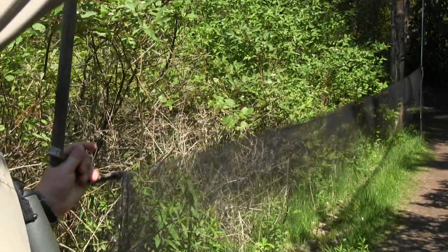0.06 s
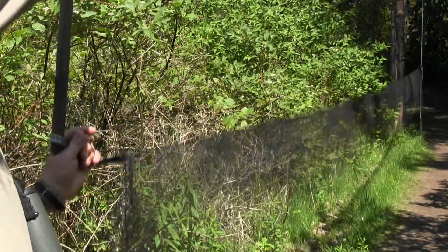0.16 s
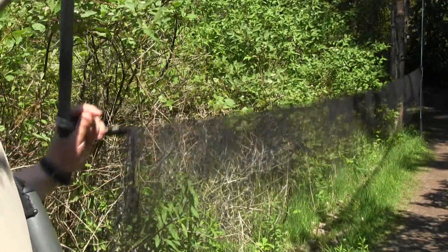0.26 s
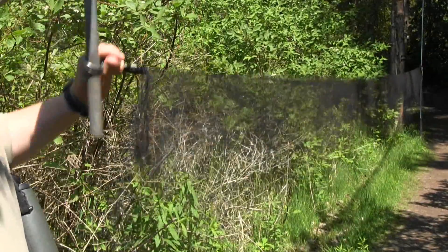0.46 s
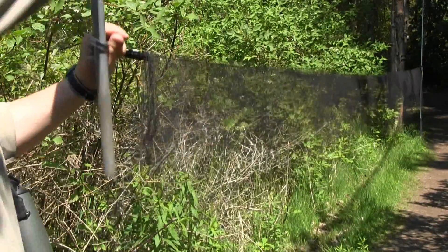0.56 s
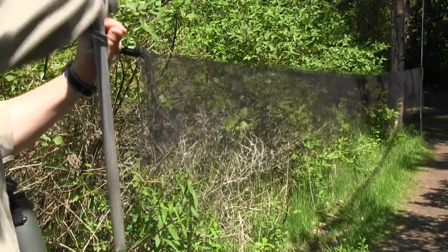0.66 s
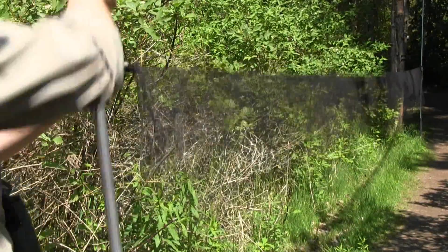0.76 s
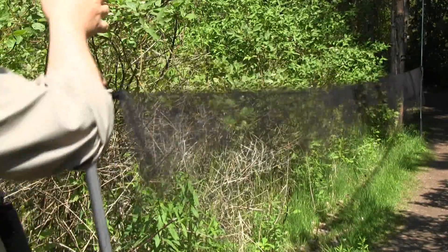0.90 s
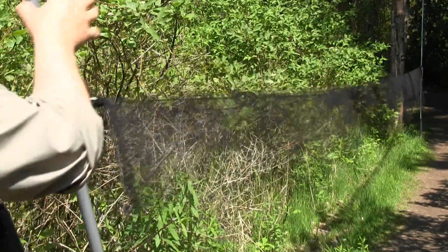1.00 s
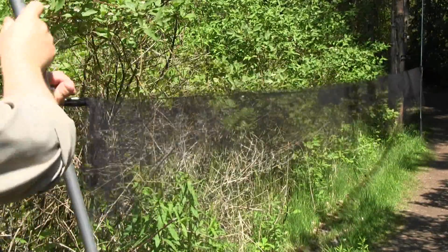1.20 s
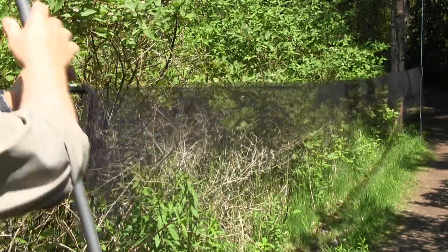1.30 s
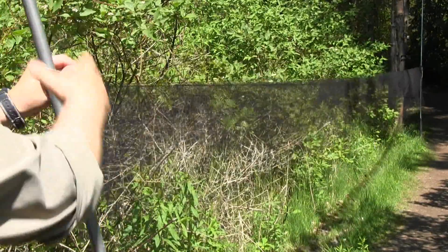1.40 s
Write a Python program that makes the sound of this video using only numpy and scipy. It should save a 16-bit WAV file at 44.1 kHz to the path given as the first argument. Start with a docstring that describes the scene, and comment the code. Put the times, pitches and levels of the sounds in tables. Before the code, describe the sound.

A hissing, zipping scrape rises as hands push a net loop along a metal pole, tightening into a rasp with small knocks before a soft thud. Sleeve rustles and faint wind on the microphone surround it outdoors.

```python
"""A net loop is pushed up a hollow metal pole beside a woodland path.
First wind rumbles on the microphone, a thin call fades, the loop ticks, and hands rustle and knock.
From 0.35 s sliding friction hisses and drives the pole's bending modes and the tube's bright wall modes;
stick-slip squeaks follow. The loop binds, rasps and stops with a dull thud near 1.08 s.
Last, the net settles, light touches ring the wall, and the hands give one more soft thud."""
import sys
import numpy as np
from scipy import signal
from scipy.fft import rfft, irfft
from scipy.io import wavfile
from scipy.ndimage import map_coordinates

SR = 44100
rng = np.random.default_rng(int(sys.argv[2]) if len(sys.argv) > 2 else 0)


def wav_out(sig):
    """Save sig, one row per channel (or a flat mono array), as 16-bit PCM at SR to the path in sys.argv[1]."""
    wavfile.write(sys.argv[1], SR, np.round(np.clip(np.atleast_2d(sig).T, -1, 1) * 32767).astype(np.int16))


N = 63945
TIME_S = np.arange(N) / SR

def from_db(db):
    """Amplitude ratio of a level in decibels."""
    return 10 ** (np.asarray(db) / 20)

def rms_one(x):
    """Normalisation to unit rms."""
    return x / np.sqrt(np.mean(x ** 2) + 1e-20)

def envelope(points):
    """Gain along a (time_s, level_db) curve, falling 400 dB/s beyond its ends."""
    time_s, db = np.transpose(points)
    outside_s = np.maximum(time_s[0] - TIME_S, 0) + np.maximum(TIME_S - time_s[-1], 0)
    return from_db(np.interp(TIME_S, time_s, db) - 400 * outside_s)

def swells(rows):
    """Superposition of Gaussian envelopes."""
    return sum(from_db(db) * np.exp(-((TIME_S - centre_s) / half_s) ** 2)
               for centre_s, half_s, db in rows)

def colour(noise, spectrum):
    """Spectral shaping by a (frequency_hz, gain_db) curve, at unit rms."""
    hz, db = np.transpose(spectrum)
    bins_hz = np.maximum(np.arange(N // 2 + 1) * SR / N, 1)
    gain = from_db(np.interp(np.log(bins_hz), np.log(hz), db))
    return rms_one(irfft(rfft(noise) * gain, N))

def drift(rate_hz):
    """Random fluctuation: low-passed noise at unit rms."""
    lowpass = signal.butter(2, rate_hz, fs=SR, output="sos")
    return rms_one(signal.sosfilt(lowpass, rng.standard_normal(2 * N))[N:])

def friction(slip_share, slips_per_s=5000, spread_db=3, flutter_db=1.78, flutter_hz=92):
    """Shot noise of slipping threads shares the power with smooth hiss; the sum flutters in level."""
    sizes = from_db(spread_db * np.minimum(rng.exponential(1, N), 5)) * rng.choice([-1, 1], N)
    slips = rms_one(sizes * (rng.random(N) < slips_per_s / SR))
    noise = np.sqrt(slip_share) * slips + np.sqrt(1 - slip_share) * rng.standard_normal(N)
    return noise * from_db(flutter_db * drift(flutter_hz))

def resonate(force, modes):
    """Modal superposition: parallel resonators, scaled so that white noise keeps its level."""
    response, power = 0, 0
    for hz, bandwidth_hz, db in modes:
        radius = np.exp(-np.pi * bandwidth_hz / SR)
        gain = (1 - radius ** 2) / 2
        feedback = [1, -2 * radius * np.cos(2 * np.pi * hz / SR), radius ** 2]
        response += from_db(db) * signal.lfilter([gain, 0, -gain], feedback, force + 1e-18)
        power += from_db(db) ** 2 * gain
    return response / np.sqrt(power)

def damped(start_s, hz, t60_s):
    """Free vibration: an exponentially decaying sine."""
    age_s = np.maximum(TIME_S - start_s, 0)
    return np.sin(2 * np.pi * hz * age_s) * from_db(-60 * age_s / t60_s)

# Gusts: time_s, level_db
WIND_LEVEL = [(0, -45), (0.15, -42), (0.22, -37), (0.32, -39), (0.44, -32), (0.53, -37), (0.75, -40),
              (1.0, -43), (1.2, -44), (1.45, -47)]
# Spectra of the wind and of the leaves: frequency_hz, gain_db
WIND_SPECTRUM = [(10, -5), (24, -3.5), (40, -6.5), (65, -17.5), (120, -27.5), (250, -30.5), (800, -48.5)]
LEAF_SPECTRUM = [(70, 4.5), (200, -0.5), (330, -1), (650, -2), (900, -5.5), (1200, -3.5), (1600, -8.5),
                 (3000, -4.5), (5500, -15.5), (8000, -13), (11000, -38), (16000, -53)]

def wind():
    """Turbulent pressure rumbles on the microphone over the steady hush of leaves."""
    rumble = envelope(WIND_LEVEL) * colour(rng.standard_normal(N), WIND_SPECTRUM)
    return rumble + from_db(-53) * colour(rng.standard_normal(N), LEAF_SPECTRUM)

def call(pitch_hz=7670, jitter_hz=30, end_s=0.25, fade_s=0.06):
    """A thin call in the bushes: one tone under slight random frequency modulation."""
    hz = pitch_hz + jitter_hz * drift(150)
    fade = np.clip((end_s - TIME_S) / fade_s, 0, 1)
    return from_db(-60.5) * fade * np.sin(2 * np.pi * np.cumsum(hz) / SR)

# Catches of the loop on the metal: start_s, peak_db
LOOP_TICKS = [(0.0857, -29), (0.161, -35.5), (0.2395, -32), (0.2565, -29), (0.3296, -32), (0.3709, -23),
              (0.4388, -21), (0.595, -12)]

def ticks(t60_s=0.013, band_hz=(2970, 9100)):
    """Brief contact has a broad spectrum: each catch is a bright, decaying noise burst."""
    bandpass = signal.butter(2, band_hz, "band", fs=SR, output="sos")
    out = np.zeros(N)
    for start_s, db in LOOP_TICKS:
        decay = (TIME_S >= start_s) * from_db(-60 * np.abs(TIME_S - start_s) / t60_s)
        crack = signal.sosfilt(bandpass, rng.standard_normal(N) * decay + 1e-18)
        out += from_db(db) * crack / np.abs(crack).max()
    return out

# Movements of hand and sleeve: centre_s, half_length_s, level_db
SLEEVE_SWELLS = [(0.088, 0.016, -45.5), (0.115, 0.02, -47), (0.165, 0.048, -59.5), (0.222, 0.024, -49),
                 (0.262, 0.0076, -42), (0.31, 0.11, -49), (1.403, 0.013, -52.5)]
# Spectrum of the cloth: frequency_hz, gain_db
SLEEVE_SPECTRUM = [(60, -14), (170, 8.5), (400, 7), (1200, 3), (3000, -1), (6500, -4.5), (10000, -9.5),
                   (16000, -32)]

def rustles():
    """Fast random amplitude modulation makes the friction of cloth crackle."""
    crackle = friction(slip_share=0.68) * from_db(2.5 * drift(450))
    return swells(SLEEVE_SWELLS) * colour(crackle, SLEEVE_SPECTRUM)

# Hands striking the pole: start_s, level_db, pitch_hz
HAND_KNOCKS = [(0.1535, -19.5, 1760), (0.2403, -27.5, 254), (0.2535, -52, 350), (0.257, -29.5, 384),
               (0.88, -21, 910), (0.904, -13.5, 760), (0.968, -17, 530), (1.0211, -13, 740),
               (1.069, -17.5, 654)]

def knocks(t60_cycles=3.1, low_cut_hz=70):
    """Heavily damped impacts: a main partial and a weaker, lower one that lasts longer."""
    out = np.zeros(N)
    for start_s, db, hz in HAND_KNOCKS:
        t60_s = t60_cycles / hz
        lower = 0.35 * damped(start_s, 0.43 * hz, t60_s / 0.23)
        out += from_db(db) * (damped(start_s, hz, t60_s) + lower)
    return signal.sosfilt(signal.butter(2, low_cut_hz, "high", fs=SR, output="sos"), out + 1e-18)

# Strokes of the hands along the pole: centre_s, half_length_s, level_db
RUB_SWELLS = [(0.165, 0.037, -42), (0.25, 0.025, -36), (0.565, 0.056, -43.5), (0.725, 0.028, -48.5),
              (0.83, 0.021, -66), (1.41, 0.016, -50.5)]
# Spectrum of the strokes: frequency_hz, gain_db
RUB_SPECTRUM = [(40, 1.5), (110, -4), (200, 0), (330, -20.5), (700, -19.5), (2000, -30.5)]

def rubs():
    """Sliding friction of the hands gives swells of low noise."""
    return swells(RUB_SWELLS) * colour(friction(slip_share=0.8), RUB_SPECTRUM)

# Soft blows through the pole: start_s, pitch_hz, t60_s, level_db
POLE_THUDS = [(0.236, 122, 0.13, -29.5), (1.017, 99, 0.046, -26), (1.075, 82.4, 0.13, -21.5),
              (1.398, 70, 0.079, -31.5)]

def thuds(attack_s=0.012):
    """A soft impact builds up gradually and leaves one low damped vibration."""
    return sum(from_db(db) * damped(start_s, hz, t60_s) * np.clip((TIME_S - start_s) / attack_s, 0, 1)
               for start_s, hz, t60_s, db in POLE_THUDS)

# Echo running back along the tube to the loop: time_s, delay_ms
ECHO_DELAY = [(0.38, 0.138), (0.53, 0.138), (0.60, 0.28), (0.63, 0.32), (0.665, 0.40), (0.73, 0.43),
              (0.77, 0.6), (0.80, 0.93), (0.86, 1.5), (1.1, 2.4)]

def tube_echo(force, reflection=0.33):
    """Comb filtering: the delay grows as the loop climbs, so the notches sweep downward."""
    time_s, delay_ms = np.transpose(ECHO_DELAY)
    delay_samples = np.interp(TIME_S, time_s, delay_ms) * SR / 1000
    echo = map_coordinates(force, [np.arange(N) - delay_samples], order=3)
    return rms_one(force + reflection * echo)

# Strength of the sliding hiss and of the drive on the bending modes: time_s, level_db
HISS_LEVEL = [(0.35, -52), (0.385, -36), (0.44, -32), (0.50, -25.5), (0.55, -23), (0.582, -28.5),
              (0.596, -19), (0.61, -33), (0.635, -25.5), (0.665, -31), (0.738, -31), (0.75, -25.5),
              (0.80, -24), (0.825, -20), (0.884, -18), (0.90, -24.5), (1.03, -28.5), (1.07, -24.5),
              (1.095, -42), (1.15, -53.5)]
BENDING_DRIVE = [(0.36, -64), (0.378, -41), (0.445, -39.5), (0.49, -33.5), (0.56, -30), (0.61, -29),
                 (0.67, -33), (0.74, -34), (0.79, -39), (0.84, -33), (0.89, -37.5), (0.94, -35),
                 (1.0, -34.5), (1.06, -40.5), (1.09, -63)]
# Spectrum of the hiss: frequency_hz, gain_db
HISS_SPECTRUM = [(100, -31), (300, -13.5), (600, -31.5), (1600, -23), (2600, -2.5), (4300, -15.5),
                 (5400, -8.5), (6100, -6.5), (6600, 3), (7800, 0.5), (9500, -2.5), (10900, -12.5),
                 (14500, -14.5), (16000, -16)]
# Bending modes of the pole: frequency_hz, bandwidth_hz, gain_db
BENDING_MODES = [(606, 22, -22), (738, 20, -19), (883, 20, -16), (1040, 24, -12), (1220, 24, -12),
                 (1390, 20, -11), (1579, 16, -8), (1787, 14, -10), (2000, 24, -9), (2215, 20, -1),
                 (2455, 18, -2), (2701, 22, -5), (2938, 28, -4), (3205, 26, -6), (3469, 26, -5),
                 (3750, 34, -11), (4010, 38, -11), (4330, 50, -12), (4640, 42, -12), (4950, 55, -13)]

def slide():
    """Forced vibration: the loop's friction is heard as hiss and also drives the bending modes."""
    force = tube_echo(friction(slip_share=0.42))
    hiss = from_db(-2) * envelope(HISS_LEVEL) * colour(force, HISS_SPECTRUM)
    return hiss + resonate(force * envelope(BENDING_DRIVE), BENDING_MODES)

# Drive of the loop on the tube wall: time_s, level_db
WALL_DRIVE = [(0.37, -53), (0.50, -35), (0.55, -31.5), (0.635, -26.5), (0.67, -30), (0.73, -40),
              (0.75, -22.5), (0.80, -38), (0.85, -23), (0.885, -26.5), (0.93, -27), (1.03, -30),
              (1.068, -21.5), (1.085, -49)]
# Light touches after the stop: centre_s, half_length_s, level_db
WALL_TOUCHES = [(1.1, 0.0062, -41.5), (1.232, 0.0056, -50), (1.257, 0.006, -59), (1.305, 0.01, -60),
                (1.355, 0.0091, -55)]
# Wall modes of the tube: frequency_hz, bandwidth_hz, gain_db
WALL_MODES = [(6410, 28, 0), (6485, 34, -1), (6570, 90, -7)]

def wall_ring():
    """Resonance: closely spaced wall modes select a bright ring from broadband friction."""
    drive = envelope(WALL_DRIVE) + swells(WALL_TOUCHES)
    return resonate(drive * friction(slip_share=0.42), WALL_MODES)

# Zipping squeaks of the loop: start_s, length_s, start_hz, end_hz, level_db
SQUEAK_GLIDES = [(0.565, 0.06, 4700, 3700, -36), (0.608, 0.045, 2970, 2910, -23.5),
                 (0.607, 0.045, 2450, 2200, -29), (0.66, 0.045, 2230, 2200, -32),
                 (0.7, 0.036, 2970, 2930, -28), (0.742, 0.056, 3620, 2680, -23.5),
                 (0.768, 0.054, 2300, 1960, -25.5), (0.82, 0.045, 3100, 3600, -31),
                 (0.899, 0.014, 9800, 9800, -23), (0.912, 0.018, 10600, 10400, -27)]

def squeaks(jitter_hz=105, roughness_db=2.2):
    """Stick-slip oscillation: unsteady tones glide and excite the bending modes that they cross."""
    tones = np.zeros(N)
    for start_s, length_s, start_hz, end_hz, db in SQUEAK_GLIDES:
        progress = np.clip((TIME_S - start_s) / length_s, 0, 1)
        hz = start_hz + (end_hz - start_hz) * progress + jitter_hz * drift(450)
        arch = np.sqrt(np.sin(np.pi * progress).clip(0))
        tones += from_db(db + roughness_db * drift(250)) * arch * np.sin(2 * np.pi * np.cumsum(hz) / SR)
    tone_rms = np.std(tones)
    ring = tone_rms * rms_one(resonate(tones, BENDING_MODES))
    return tone_rms * rms_one(0.8 * tones + 0.55 * ring)

# Strength of the rasp as the loop binds: time_s, level_db
RASP_LEVEL = [(0.69, -32), (0.73, -38.5), (0.79, -31), (0.84, -36), (0.88, -24.5), (0.905, -20),
              (0.93, -23.5), (0.975, -20), (1.04, -21.5), (1.072, -21.5), (1.089, -28.5), (1.098, -47),
              (1.15, -67)]
# Spectrum of the rasp: frequency_hz, gain_db
RASP_SPECTRUM = [(150, -9), (1000, -17), (2200, -8.5), (4000, -7.5), (5000, -3.5), (6000, -10), (6500, -14),
                 (7500, -0.5), (9000, 1), (9900, 0), (11200, -6), (13000, -3), (14200, -4.5), (16000, -10)]
# Higher wall modes, damped by the tight loop: frequency_hz, bandwidth_hz, gain_db
HIGH_WALL_MODES = [(8461, 60, 0), (8790, 130, -3), (9133, 70, 0), (9805, 75, -1), (12950, 160, -8),
                   (13800, 90, -8)]

def rasp():
    """Friction of the tight loop radiates broadband noise and excites the higher wall modes."""
    drive = envelope(RASP_LEVEL)
    direct = drive * colour(friction(slip_share=0.2), RASP_SPECTRUM)
    return direct + from_db(-7.5) * resonate(drive * friction(slip_share=0.2), HIGH_WALL_MODES)

# Strength of the scuffing up to the stop: time_s, level_db
SCUFF_LEVEL = [(0.84, -71), (0.88, -40), (0.945, -39), (0.968, -35.5), (1.0, -30.5), (1.074, -28.5),
               (1.09, -32.5), (1.1, -52)]
# Spectrum of the scuffing: frequency_hz, gain_db
SCUFF_SPECTRUM = [(30, -20), (60, 6), (110, -8), (280, -1), (550, -6.5), (1100, -2.5), (2000, -10.5),
                  (5000, -22.5)]

def scuff():
    """Friction dominated by discrete slips gives a low, grainy noise beneath the rasp."""
    return envelope(SCUFF_LEVEL) * colour(friction(slip_share=0.86), SCUFF_SPECTRUM)

# Movement of the net after the stop: time_s, level_db
SETTLE_LEVEL = [(1.1, -66), (1.19, -60), (1.25, -59), (1.31, -54.5), (1.37, -64), (1.45, -79)]
# Spectrum of its threads: frequency_hz, gain_db
SETTLE_SPECTRUM = [(500, -30), (1800, -8), (2900, 1), (4300, 4.5), (5500, -5), (6500, -4), (9000, 2.5),
                   (11500, -5.5), (16000, -16.5)]

def settle():
    """Shot noise alone: the net comes to rest in tiny, faint slips."""
    return envelope(SETTLE_LEVEL) * colour(friction(slip_share=1.0), SETTLE_SPECTRUM)

def scene():
    """Linear superposition of all sources, the same in both channels."""
    loop = slide() + wall_ring() + squeaks() + rasp() + scuff() + settle() + ticks()
    hands = rustles() + knocks() + rubs() + thuds()
    mono = loop + hands + wind() + call()
    return np.array([mono, mono])

def record(dry, cutoff_hz=15650):
    """Band limiting: an elliptic low-pass cuts the top treble steeply."""
    return signal.sosfilt(signal.ellip(12, 0.1, 90, cutoff_hz, fs=SR, output="sos"), dry)

dry = scene()
out = record(dry)
wav_out(out)
```